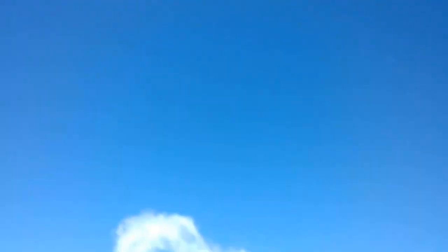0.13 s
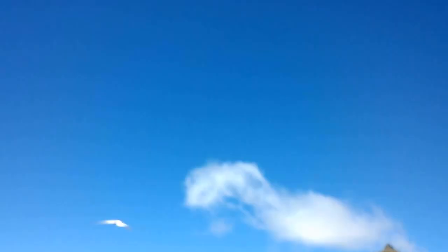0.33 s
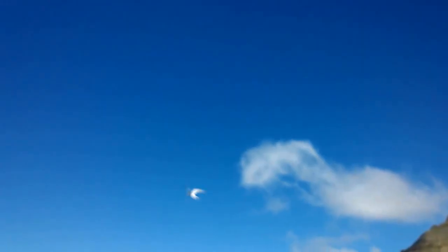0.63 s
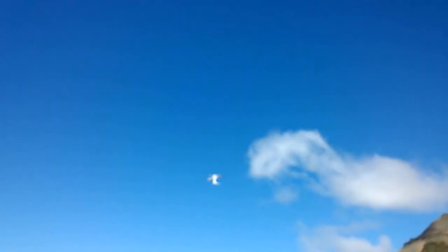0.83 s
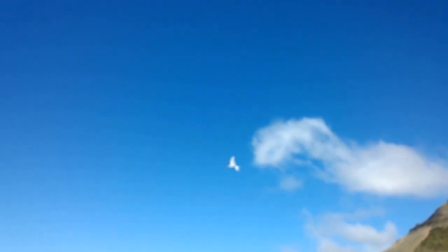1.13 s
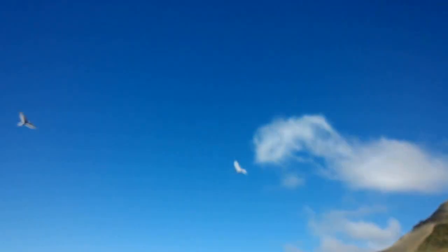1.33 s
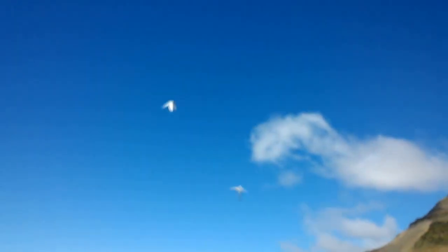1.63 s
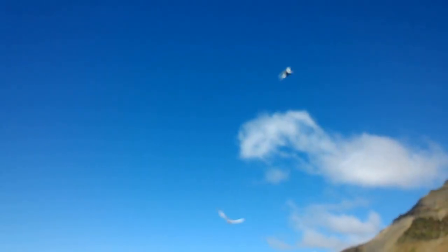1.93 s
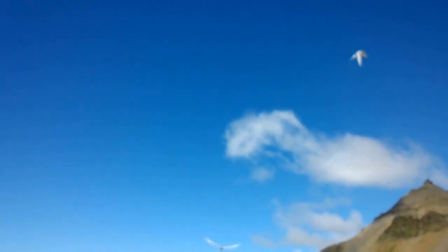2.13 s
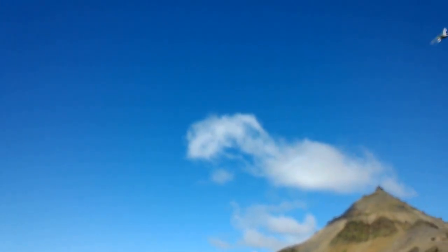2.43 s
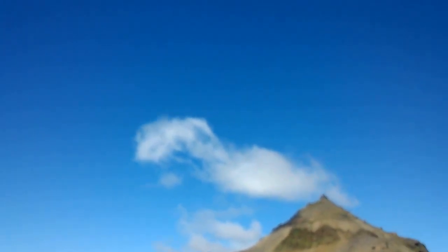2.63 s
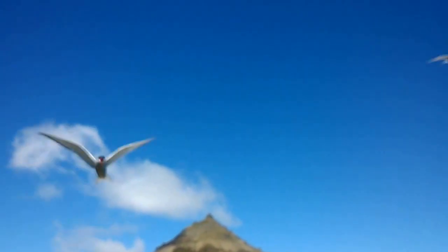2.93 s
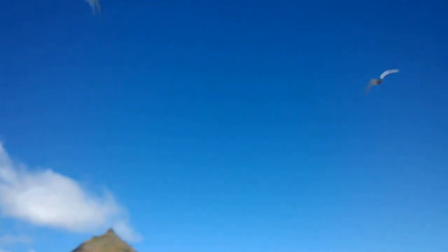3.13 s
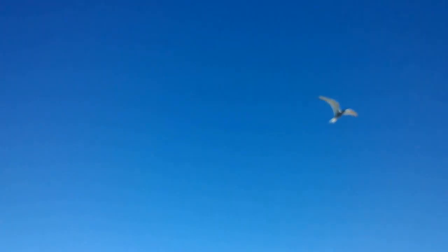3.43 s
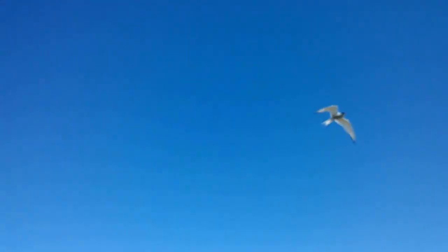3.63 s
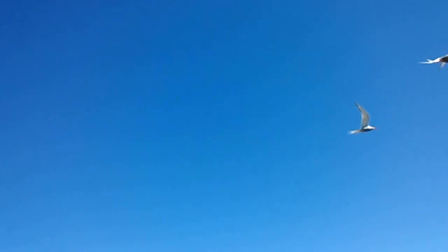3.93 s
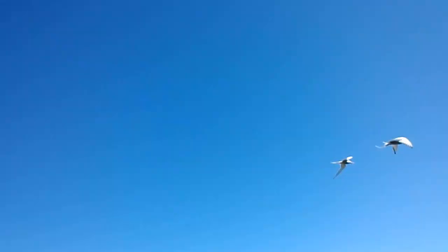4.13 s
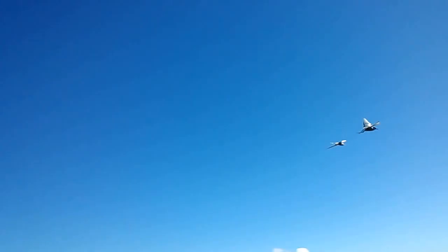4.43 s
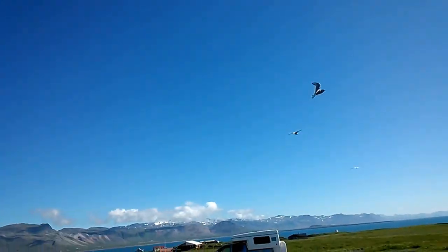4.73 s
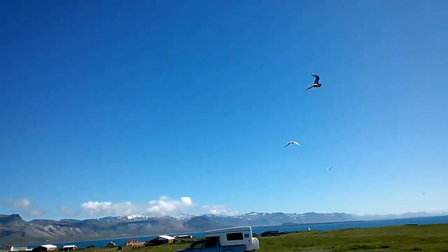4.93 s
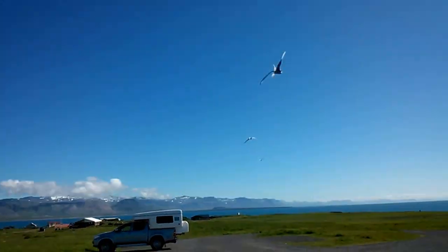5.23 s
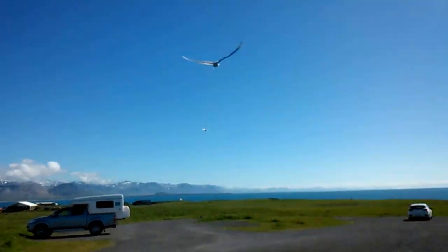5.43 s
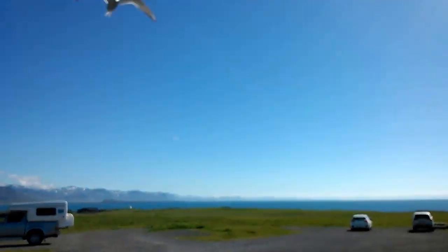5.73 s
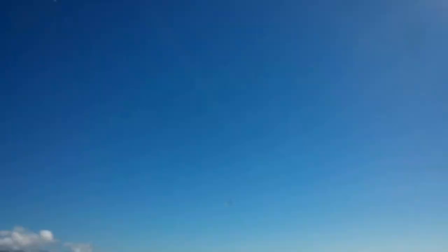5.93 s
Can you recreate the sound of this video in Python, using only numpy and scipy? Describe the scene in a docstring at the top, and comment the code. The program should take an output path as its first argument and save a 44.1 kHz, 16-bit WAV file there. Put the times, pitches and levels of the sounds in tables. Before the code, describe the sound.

Wind buffets a single microphone in an open field, with deep uneven rumble and blunt thumps. Above it, terns give high throbbing cries, dry croaks and a one-second-mark rasping rattle. Crisp keks build from about two seconds to a loud close attack just after three. After a throbbing cry and quieter calls, keks return quickly and end in a sudden screech. Hardly any echo, only faint hiss.

```python
"""Terns mobbing over open ground

Arctic terns mob an intruder: arched, throbbing 'kee-arr' cries and croaks, thin whistles, sharp 'kek' notes
and rasping rattles. A syrinx swinging freely is a harmonic series; one slapping shut is a noisy pulse train,
shaped by throat and beak. Harsh close rattles swell quickly and fade; the ground adds a faint tail.
Wind, as filtered noise and pressure pulses, rumbles and thumps on one microphone over patchy hiss and crackles."""
import sys
import numpy as np
from scipy import signal
from scipy.fft import rfft, irfft, next_fast_len
from scipy.io import wavfile
from scipy.ndimage import map_coordinates

SR = 44100
rng = np.random.default_rng(int(sys.argv[2]) if len(sys.argv) > 2 else 0)


def unload_wav(signal):
    """Save mono or channel-first audio to the path in sys.argv[1] as 16-bit WAV at rate SR, clipped to [-1, 1]."""
    wavfile.write(
        sys.argv[1],
        SR,
        np.round(np.clip(np.atleast_2d(signal).T, -1, 1) * 32767).astype(np.int16),
    )


N = 268304
TIME = np.arange(N) / SR  # [s]
TOP_HZ = 16000  # upper band limit

# Throbbing cries: (time [s], length [s], crest delay [s], crest pitch [Hz], end pitch [Hz], base level [dB],
# swell to the end [dB], octave re fundamental [dB], mean break rate [1/s], roughness [0-1], onset rasp re base [dB])
CRY_CALLS = [(0.083, 0.17, 0.054, 3120, 3020, -80.5, 7, -24, 28.5, 0.04, -36),
             (0.598, 0.18, .055, 3550, 3230, -39.5, -0.5, -15, 34.6, .07, -44),
             (1.403, .11, 0.045, 3400, 3310, -53.5, -8, -8, 54, 0.2, -17.5),
             (1.865, 0.069, .035, 3040, 2930, -59.5, -9, -2, 50, 0.06, -7),
             (3.978, .245, 0.14, 3272, 3142, -32, -10.5, -11.5, 40.8, .1, -8.5),
             (4.921, .222, 0.074, 3360, 3184, -44.5, 4, -15.5, 40, 0.15, -26.5)]
# Thin whistles: (time [s], length [s], crest delay [s], crest pitch [Hz], end pitch [Hz], level [dB],
# swell to the end [dB], octave re fundamental [dB], roughness [0-1])
WHISTLE_CALLS = [(1.934, 0.044, .011, 4100, 2770, -51.5, -6, -0.5, .17),
                 (1.981, 0.021, .006, 3140, 2920, -64, -3, -6, .3),
                 (2.292, 0.18, 0.033, 3500, 3400, -62, 6, -9.5, .01),
                 (3.666, 0.19, .02, 3552, 3475, -46, -17, -6.5, .015),
                 (5.918, 0.054, 0.012, 3300, 2970, -64, 4, -32, .15)]
# Distant rattles: (time [s], length [s], syllable rate [1/s], mean pulse rate at syllable start [1/s],
# base level [dB], swell to the end [dB], whistle re hoarse voice [dB], treble shelf [dB], roughness [0-1])
RASP_CALLS = [(0.196, 0.067, 51, 910, -53.5, -5, -12, 6, .5),
              (0.431, 0.042, 49, 790, -53, 12, -21, 2.5, 0.42),
              (0.987, 0.31, 47, 743, -35.5, 2, 1.5, -5.5, 0.7),
              (2.036, .17, 51, 810, -62.5, 15.5, -15, -45, 0.22),
              (3.878, 0.086, 41, 900, -52, -17, -10, -27.5, .3),
              (4.512, 0.13, 45, 1880, -55.5, -4, -18.5, -4, 0.62)]
# Croaked syllables: (time [s], length [s], first pulse rate [1/s], last pulse rate [1/s], level [dB],
# roughness [0-1], treble shelf [dB])
CROAK_SYLLABLES = [(0.256, 0.028, 2880, 2700, -62.5, 0.2, -25), (0.285, 0.023, 1000, 550, -59, 0.33, -19),
                   (0.785, 0.024, 1080, 1030, -46, 0.01, 2), (0.807, 0.024, 1020, 1010, -48.5, 0.1, 6),
                   (0.832, 0.023, 2050, 1700, -44.5, 0.17, 3), (0.855, 0.019, 1220, 980, -45, 0.14, 1),
                   (0.874, 0.022, 800, 750, -41.5, 0.6, 10), (0.893, 0.0218, 760, 750, -52, 0.9, 1),
                   (1.474, 0.046, 1800, 1700, -59.5, 0.6, -12), (4.223, 0.027, 1820, 1880, -52.5, 0.2, -11),
                   (4.248, 0.023, 980, 970, -51, 0.4, -15), (4.267, 0.033, 880, 710, -52.5, .3, -19.5),
                   (5.143, 0.022, 2070, 1900, -46.5, 0.14, -22),
                   (5.165, 0.026, 1850, 1630, -51.5, 0.3, -29), (5.187, 0.032, 580, 710, -54.5, 0.4, -20)]
# Harsh close screeches: (time [s], length [s], syllable rate [1/s], early hurry [s], sounding share [0-1],
# mean pulse rate at syllable start [1/s], roughness [0-1], peak level [dB], peak delay [s], peak half width [s])
SCREECH_CALLS = [(3.17, .195, 54.5, .0095, 0.86, 900, .55, -16.5, .024, 0.022),
                 (6.011, .08, 51, 0.00093, 1, 830, 0.57, -18, 0.0038, 0.021)]
# Clear whistled core of the second screech: (time [s], length [s], pitch [Hz], fundamental [dB], octave [dB],
# third harmonic [dB])
SHRIEK_TONES = [(6.013, 0.0093, 3055, -24, -17, -24.5), (6.04, 0.0084, 3774, -16.5, -33.5, -58),
                (6.056, 0.014, 3130, -26, -23.5, -23)]
# 'Kek' notes: (time [s], level [dB], treble shelf [dB], fade time [s], beak resonance [Hz])
KEK_NOTES = [(1.815, -44.5, -7, 0.011, 2730), (2.009, -41, -11.5, 0.0099, 2670),
             (2.167, -33.5, -8, 0.0097, 2710), (2.2858, -36, -11.5, 0.015, 5340),
             (2.4278, -28, -11.5, 0.012, 2840), (2.7804, -31, -15.5, 0.012, 2300),
             (2.9186, -20, -11.5, 0.012, 5140), (3.043, -30, -9, 0.011, 2330),
             (3.068, -13.5, -6, 0.019, 4300), (3.8554, -41.5, -8.5, 0.015, 3660),
             (5.22, -37, -9.5, 0.022, 3010), (5.3549, -30, -9, 0.014, 3000),
             (5.5213, -26, -11, 0.015, 3470), (5.686, -25.5, -13, .013, 2780),
             (5.8368, -41, -2, 0.0086, 3860), (5.8626, -19, -7.5, 0.018, 4000),
             (5.9851, -25, -3, 0.0084, 3970), (5.994, -30.5, -9, 0.012, 3970)]

# Throat resonances as relative spectra: (frequency [Hz], density [dB])
HOARSE_SPECTRUM = [(500, -25.5), (1000, -14.5), (1800, -1), (2700, 3), (3500, -1), (4300, -29.5),
                   (15000, -51)]
CROAK_SPECTRUM = [(700, -36), (1100, -16.5), (1450, 2), (2000, -0.5), (3300, 2), (4700, -7.5), (5500, -6.5),
                  (6500, -8), (7400, -29.5), (9500, -25.5), (15000, -31.5)]
FAR_SPECTRUM = [(700, -75), (1200, -23), (2000, -6.5), (2500, -13), (3000, 1), (3400, -11), (3900, -5),
                (5000, -17.5), (6500, -24.5), (7500, -38.5), (9200, -10.5), (11500, -30.5), (14000, -47)]
NEAR_SPECTRUM = [(500, -32), (1000, -28), (2000, -16.5), (2800, -14.5), (3400, -5), (4450, -3),
                 (5100, -18.5), (5900, -12), (8000, -27.5), (9800, -15), (12000, -23.5), (16000, -34.5)]
KEK_SPECTRUM = [(500, -26.5), (1000, -22.5), (2200, -10), (3100, -3.5), (3600, -11), (4200, -5),
                (5300, -8.5), (6500, -7.5), (8000, -17), (10500, -13.5), (15000, -16), (16500, -50)]

# Scatter from the terrain: (frequency [Hz], decay time to -60 dB [s])
GROUND_DECAY = [(300, .3), (3000, 0.85), (12000, 0.1)]
# Wind on the microphone, before gusts and trim: (time [s], rumble level [dB], flutter level [dB])
WIND_LEVELS = [(0, -39.5, -55), (.11, -75, -100), (.18, -83, -69), (.23, -27, -35.5), (.85, -29, -35.5),
               (1.15, -27.5, -39.5), (1.8, -23, -36.5), (2.1, -29.5, -45.5), (2.4, -28, -35.5),
               (2.67, -40.5, -68.5), (2.85, -34, -60), (3.18, -33, -46), (3.3, -47, -94), (3.48, -29, -77),
               (3.85, -28, -44), (4.02, -29.5, -60), (4.22, -24, -49), (4.33, -29.5, -36),
               (4.58, -32.5, -51), (4.85, -30.5, -43), (5.1, -32, -58.5), (5.45, -34, -62.5),
               (6.08, -29.5, -38.5)]
# Relative spectra of the wind noise: (frequency [Hz], density [dB])
RUMBLE_SPECTRUM = [(15, -48), (25, -19), (40, 2.5), (62, 8.5), (110, 4), (200, -8), (320, -27.5),
                   (500, -51.5), (900, -81)]
FLUTTER_SPECTRUM = [(100, -37), (200, 4), (300, 3.5), (500, -7.5), (750, -20.5), (1100, -34.5),
                    (1600, -46.5), (4000, -110)]
# Eddies, before the port leak: (time [s], pressure [dB], half width [ms], surrounding gust [dB])
EDDIES = [(.228, -17, 0.75, -3.5), (.312, -0.5, 1.54, -1.5), (.487, -1.5, 0.77, -4.5), (.494, -7, .4, -4),
          (.52, -12, 1.03, -1.5), (.552, -12.5, 0.76, -0.5), (.834, -15.5, 1.2, 0), (.889, -11, 1.2, 0.5),
          (.965, -7, 0.54, 3.5), (1.02, -4, 1.1, -8.5), (1.107, -12, 1.5, -4), (1.358, -10, 0.87, -3),
          (1.384, -12.5, 0.56, -3), (1.439, -13, 2.1, -7), (1.455, -3.5, 0.62, 0.5),
          (1.554, -4.5, 1.64, -3), (1.652, -9.5, 0.91, -5), (1.758, -6.5, 1.06, -3),
          (1.88, -7, 1.95, -10.5), (1.957, -7, 0.66, -4.5), (1.994, -5.5, 0.62, 0.5),
          (2.209, -10.5, 0.95, 2), (2.305, -7.5, 0.7, 5), (2.328, -5, 0.5, -12), (2.388, -14.5, 0.65, -5),
          (2.478, -5.5, 1.07, 9), (2.497, -10, 0.98, 0.5), (2.606, -13.5, 0.81, 2), (2.77, -13.5, 5.8, 14),
          (2.901, -24, 2.5, 9), (3.163, -19, 1.45, -1), (3.57, -10.5, 14, 12), (3.722, -4, 2.2, 8.5),
          (4.292, -0.5, 0.17, 7.5), (4.311, -13.5, 0.3, 0.5), (4.33, -10, 0.3, 0.5), (4.348, -15, 0.31, 3),
          (4.383, -13.5, .35, 4), (4.4, -14.5, 0.38, -1.5), (4.47, -13.5, 0.4, 9), (4.666, -10, 1.5, 0),
          (4.723, -10, 0.49, 0.5), (4.777, -10.5, 1.57, 0), (4.828, -14, 1.18, 3), (4.85, -14, 0.98, 0),
          (5.014, -15, 0.65, 2.5), (5.167, -3.5, 0.44, 9), (5.177, -9, 0.62, 3.5), (5.548, -7, 1.75, 13),
          (5.697, -2, 1.19, 5.5), (5.821, -13.5, 1, 2), (5.962, -10.5, 0.96, -9.5),
          (5.992, -13.5, 0.21, 11)]
# Patches of airy hiss: (time [s], length [s], level [dB], swell to the end [dB])
AIR_PATCHES = [(0, 0.061, -63, -19), (2.527, 0.38, -54.5, -42.5), (2.769, 0.73, -63.5, 13),
               (4.97, 0.2, -62.5, -4), (5.345, 0.15, -56.5, -10), (5.58, 0.1, -61, 24.5),
               (5.818, 0.12, -59.5, -7.5)]
# Relative spectrum of the hiss: (frequency [Hz], density [dB])
HISS_SPECTRUM = [(300, -1), (1000, 2), (4000, -1.5), (7000, -11), (9500, -5.5), (12000, -12.5),
                 (16000, -11.5)]
# Soft treble crackles, before their rising ramp: (time [s], length [s], level [dB])
CRACKLES = [(.481, 0.012, -47.5), (.726, 0.17, -43.5), (5.588, 0.133, -49.5), (5.751, 0.061, -52)]

CRY_SCOOP, CRY_ATTACK_S, CRY_ATTACK_DB = .17, 0.039, 12  # a cry starts this share flat, and this much softer
CRY_BELLY_DB = 0.5  # mid-cry boost
FRAY_SHARE = 1 / 3  # pitch of the hoarse voice over that of the whistle
BREAK_DEPTH, BREAK_WIDTH = .88, .15  # share of the level lost; half width in throb periods
BREAK_LIFT = .04  # share of pitch gained, times the squared depth of the gap
ONSET_RASP_RATE, ONSET_RASP_FADE_DB = 800, 31.5  # mean pulses per second; loss by the end of the cry
WHISTLE_SCOOP, SCOOP_S = 0.057, 0.014  # share of pitch flat at the start; scoop time
ARCH_POWER = 0.88  # exponent of the pitch sag away from the crest; below 1 is pointed
RASP_EDGE_S, RASP_EDGE_DB, RASP_SAG_DB = 0.012, 7.5, 6  # soft outer syllables, slack middle
SYLLABLE_SCATTER_DB, PITCH_SCATTER = 1.5, .022  # standard deviations between rattle syllables
BEAK_DB, BEAK_WIDTH_HZ = 5.5, 580  # height and half width of the beak resonance
KEK_ATTACK_S, KEK_ATTACK_DB = 0.0018, 10.5  # rise time of a note; how much softer it starts
GUST_S, FLUTTER_GROWS = 0.032, 1.76  # half length of a gust; flutter gain in dB per dB of rumble
AIR_FLOOR_DB, AIR_EDGE_SHARE = -82, 0.021  # hiss between patches; share of a patch spent on each fade
CEILING, CEILING_HARDNESS = .55, 4  # limit as a share of full scale; how abruptly it is reached


def amp(db):
    """Level in decibels as an amplitude ratio."""
    return 10 ** (np.asarray(db) / 20)


def unit(x):
    """Normalization to an rms of 1."""
    return x / np.sqrt(np.mean(x ** 2) + 1e-20)


def along(points, hz):
    """Linear interpolation of (frequency, value) points on a logarithmic frequency axis."""
    f, v = np.transpose(points)
    return np.interp(np.log(hz + 1), np.log(f + 1), v)


def curves(rows, t):
    """Linear interpolation in time of each column after the first."""
    s, *cols = np.transpose(rows)
    return [np.interp(t, s, c) for c in cols]


def wobble(rate, size):
    """Smooth random modulation: a spline through normal deviates, rate knots a second."""
    knots = rng.standard_normal(int(size * rate / SR) + 4)
    return map_coordinates(knots, [np.arange(size) * rate / SR])


def filtered(x, response):
    """Linear filtering: the spectrum of x times a response of frequency."""
    m = next_fast_len(len(x) + 8192)
    return irfft(rfft(x, m) * response(np.fft.rfftfreq(m, 1 / SR)), m)[:len(x)]


def coloured(x, spectrum, treble_db=0):
    """Minimum-phase filtering: folding the cepstrum makes the resonances ring causally; rms 1."""
    m = 2 * next_fast_len(len(x) + SR // 10)
    hz = np.fft.rfftfreq(m, 1 / SR)
    shelf_db = along([(5000, 0), (8500, treble_db)], hz)
    cepstrum = irfft(np.log(amp(along(spectrum, hz) + shelf_db)))
    cepstrum[1:m // 2] *= 2
    cepstrum[m // 2 + 1:] = 0
    return unit(irfft(rfft(x, m) * np.exp(rfft(cepstrum)))[:len(x)])


def span(length):
    """Sample times from 0 to length, at least 16 of them."""
    return np.arange(max(int(length * SR), 16)) / SR


def fade(t, edge):
    """Sine-squared envelope that softens the start and end of a note."""
    return np.sin(np.pi / 2 * np.clip(np.minimum(t - t[0], t[-1] - t) / edge, 0, 1)) ** 2


def add(track, s, x):
    """Superposition of x on the track from s seconds on."""
    part = track[round(s * SR):][:len(x)]
    part += x[:len(part)]


def whistle(pitch, levels_db, rough):
    """Free oscillation of the syrinx: harmonics sharing one tremor of phase and strength."""
    size = len(pitch)
    drifting = pitch * (1 + 0.0005 * wobble(210, size))
    phase = 2 * np.pi * np.cumsum(drifting) / SR + rough * wobble(720, size)
    stack = sum(amp(db) * np.sin(k * phase) for k, db in enumerate(levels_db, 1))
    return np.sqrt(2) * stack * (1 + rough * wobble(1000, size))


def clatter(rate, rough):
    """Impact excitation: the syrinx slaps shut unevenly, each pulse trailing a puff of turbulence."""
    size, rough = len(rate), np.clip(rough, 0, 1)
    cycles = np.cumsum(rate * np.exp(.13 * rough * wobble(900, size))) / SR + .9
    offset = ((cycles + .5) % 1 - .5) / rate  # seconds from the nearest slap
    slaps = np.sinc(2 * TOP_HZ * offset) * np.exp(-(offset * TOP_HZ / 2) ** 2)
    pulses = slaps * amp(4 * rough * wobble(1000, size))
    puffs = rng.standard_normal(size) * np.exp(-2 * (cycles % 1))
    return unit(pulses - pulses.mean()) + rough * unit(puffs)


def harsh(rate, rough, throat, treble_db=0):
    """Source and filter: pulses through throat and beak resonances that vary from call to call."""
    def beak(hz):
        ripple = map_coordinates(rng.standard_normal(64), [hz / 400], mode="mirror")
        delay = .0009 * (1 + .5 * ripple)  # resonant frequencies linger, so the pulses run together
        return amp(3 * ripple) * np.exp(-2j * np.pi * np.cumsum(delay) * hz[1])
    return coloured(filtered(clatter(rate, rough), beak), throat, treble_db)


def arch(t, crest_s, crest_hz, end_hz, scoop):
    """Frequency glide of a call: it scoops up from below, crests and sags to its end."""
    away = np.abs(t - crest_s) / max(t[-1] - crest_s, .001)
    sagging = crest_hz - (crest_hz - end_hz) * away ** ARCH_POWER
    return sagging * (1 - scoop * np.exp(-(t / SCOOP_S) ** 2))


def cries(third_db=-5, fourth_db=-12.5, fray_db=-17, fray_s=0.017):
    """Amplitude and frequency modulation: an arched tone breaks off repeatedly, its pitch flicking up each time."""
    out = np.zeros(N)
    for (s, length, crest_s, crest_hz, end_hz, db, swell_db,
         octave_db, rate, rough, rasp_db) in CRY_CALLS:
        t = span(length)
        u = t / length
        from_break = np.abs((t * rate + 0.045 * wobble(22, len(t)) + .5) % 1 - .5)
        gap = np.exp(-(from_break / BREAK_WIDTH) ** 3) * BREAK_DEPTH
        pitch = arch(t, crest_s, crest_hz, end_hz, CRY_SCOOP) * (1 + BREAK_LIFT * gap ** 2)
        attack_db = CRY_ATTACK_DB * np.maximum(1 - t / CRY_ATTACK_S, 0)
        level_db = db + swell_db * u + CRY_BELLY_DB * np.sin(np.pi * u) - attack_db
        uneven_db = rough * 12 * wobble(35, len(t))  # rougher cries are also less even
        harmonics_db = [uneven_db, octave_db, octave_db + third_db, octave_db + fourth_db]
        tone = whistle(pitch, harmonics_db, rough)
        # towards the end a hoarse lower voice creeps in under the whistle
        fray = amp(fray_db) * np.exp((t - t[-1]) / fray_s)
        tone = tone + fray * harsh(FRAY_SHARE * pitch, 0.055, CROAK_SPECTRUM)
        add(out, s, amp(level_db) * tone * (1 - gap) * fade(t, 0.004))
        # a hoarse rasp sounds under the start of the cry and fades raggedly
        rasp = harsh(np.full(len(t), ONSET_RASP_RATE), 0.89, HOARSE_SPECTRUM)
        rasp = rasp * amp(1.3 * wobble(90, len(t)))
        fading = amp(db + rasp_db - ONSET_RASP_FADE_DB * u ** 2)
        add(out, s - .008, fading * rasp * (1 - gap / 2) * fade(t, 0.0055))
    return out


def croaks():
    """Pulse-train voicing: short syllables of stacked partials whose pulse rate glides, mostly downward."""
    out = np.zeros(N)
    for s, length, first_rate, last_rate, db, rough, treble_db in CROAK_SYLLABLES:
        t = span(length)
        rate = np.linspace(first_rate, last_rate, len(t))
        voice = harsh(rate, rough, CROAK_SPECTRUM, treble_db)
        add(out, s, amp(db) * voice * fade(t, .005))
    return out


def screeches(fall=0.14):
    """Swelling rattle: harsh syllables rise to a peak and fade; piercing tones cut through the second."""
    out = np.zeros(N)
    for (s, length, rate, hurry_s, share, pulse_rate,
         rough, peak_db, peak_s, width_s) in SCREECH_CALLS:
        t = span(share / rate + 0.011)
        decay = np.exp(-np.maximum(t - .8 * share / rate, 0) / .003)
        shape = fade(t, .003) * (.12 + .88 * decay)
        for k, beat in enumerate(np.arange(0, length, 1 / rate)):
            after = beat - hurry_s * (1 - np.exp(-k / 1.3))
            swell = 1 / np.hypot(1, (after - peak_s) / width_s)
            pulses = pulse_rate * np.exp(rng.normal(0, 0.036)) * (1 - fall * t / t[-1])
            voice = harsh(pulses, rough, NEAR_SPECTRUM)
            add(out, s + after, amp(peak_db) * swell * voice * shape)
    for s, length, pitch, *levels in SHRIEK_TONES:
        t = span(length)
        add(out, s, whistle(np.full(len(t), pitch), levels, rough=0.18) * fade(t, 0.0011))
    return out


def keks(rate=600, rough=.6):
    """Damped pulse train: slaps of the syrinx swell at once, slow down and fade; the open beak lifts one band."""
    out, t = np.zeros(N), span(.06)
    for s, db, treble_db, life, beak_hz in KEK_NOTES:
        slowing = rate * np.exp(rng.normal(0, 0.1) - 5 * t)
        voice = harsh(slowing, rough, KEK_SPECTRUM, treble_db)
        voice = unit(filtered(voice, lambda hz: amp(
            BEAK_DB * np.exp(-((hz - beak_hz) / BEAK_WIDTH_HZ) ** 2))))
        shape = fade(t, 0.00082) * (np.exp(-(t / life) ** 2) + 0.037 * np.exp(-t / life))
        rise_db = KEK_ATTACK_DB * np.minimum(t / KEK_ATTACK_S - 1, 0)
        add(out, s, amp(db + rise_db) * voice * shape)
    return out


def rasps(pitch_hz=3030, fall=0.038):
    """Rapid syllabic modulation: a run of hoarse pulse trains, each mixed with a falling whistle."""
    out = np.zeros(N)
    for s, length, rate, pulse_rate, db, swell_db, tone_db, treble_db, rough in RASP_CALLS:
        t = span(1 / rate)
        shape = fade(t, 0.002) * (0.12 + np.exp(-(t * rate / 0.74) ** 5))
        for after in np.arange(0, length, 1 / rate):
            u = after / length
            edge = max(1 - min(after, length - after - t[-1]) / RASP_EDGE_S, 0)
            level_db = db + swell_db * u - RASP_SAG_DB * np.sin(np.pi * u) - RASP_EDGE_DB * edge
            bend = (1 + PITCH_SCATTER * rng.normal()) * (1 - fall * t * rate)
            hoarse = harsh(pulse_rate * bend, rough, FAR_SPECTRUM, treble_db)
            harmonics_db = tone_db + np.array([0, -19, -21 + treble_db])
            tone = whistle(pitch_hz * bend, harmonics_db, .2)
            gain = amp(level_db + SYLLABLE_SCATTER_DB * rng.normal())
            add(out, s + after, unit(hoarse + tone) * shape * gain)
    return out


def whistles(third_db=-14, fourth_db=-21):
    """Sustained free oscillation: thin unbroken harmonic tones on an arch of pitch."""
    out = np.zeros(N)
    for s, length, crest_s, crest_hz, end_hz, db, swell_db, octave_db, rough in WHISTLE_CALLS:
        t = span(length)
        pitch = arch(t, crest_s, crest_hz, end_hz, WHISTLE_SCOOP)
        harmonics_db = [0, octave_db, octave_db + third_db, octave_db + fourth_db]
        tone = whistle(pitch, harmonics_db, rough)
        add(out, s, amp(db + swell_db * t / length) * tone * fade(t, 0.0018))
    return out


def terrain(x):
    """Diffuse scattering: convolution with noise that decays at a rate set by frequency."""
    hz, t, z = signal.stft(rng.standard_normal(SR // 2), SR, nperseg=256)
    decay = amp(-60 * t / along(GROUND_DECAY, hz)[:, None])
    tail = signal.istft(z * decay, SR, nperseg=256)[1]
    return signal.fftconvolve(x, tail / np.linalg.norm(tail))[:N]


def wind(rumble_db=-1, flutter_db=-1, port_hz=48, wake_db=-19, wake_s=0.01):
    """Turbulent pressure at the microphone port: lumpy rumble, flutter riding on it, and sharp eddies in gusts."""
    low_db, mid_db = curves(WIND_LEVELS, TIME)
    lumps = wobble(55, N)
    rumble = coloured(rng.standard_normal(N) * amp(2 * lumps), RUMBLE_SPECTRUM)
    flutter = coloured(rng.standard_normal(N), FLUTTER_SPECTRUM)
    flutter = unit(flutter * amp(9 * np.tanh(lumps / 1.5) + 3 * wobble(130, N)))
    (eddies, wakes, gust_db), t = np.zeros((3, N)), span(.2) - .1
    for s, db, width_ms, swell_db in EDDIES:
        u = 1000 * t / width_ms
        push = amp(db) / (1 + u * u) * (1 + 0.094 * wobble(688, len(t)))
        add(eddies, s + t[0], push * fade(t, 0.0076))
        wake = amp(db + wake_db) * np.exp(-(t / wake_s) ** 2)
        add(wakes, s + t[0], wake / (1 + width_ms / 2))  # small eddies churn the most
        add(gust_db, s + t[0], swell_db * np.exp(-(t / GUST_S) ** 2))
    churn_spectrum = [(80, -0.5), (250, 10.5), (650, -7.5), (950, -24.5), (1500, -34), (2200, -43), (5000, -110)]
    churn = wakes * coloured(rng.standard_normal(N), churn_spectrum)
    # the port leaks slow pressure, so each push swings back
    thumps = filtered(eddies, lambda hz: hz ** 4 / (hz ** 4 + port_hz ** 4) / (1 + (hz / 1700) ** 4))
    rumble = amp(low_db + gust_db + rumble_db) * rumble
    flutter = amp(mid_db + FLUTTER_GROWS * gust_db + flutter_db) * flutter
    gusts = rumble + flutter + thumps + churn
    return filtered(gusts, lambda hz: hz ** 4 / (hz ** 4 + 30 ** 4))  # the deepest bass escapes the port


def rustle():
    """Strongly modulated noise: brief soft crackles that grow, high in the treble."""
    out = np.zeros(N)
    spectrum = [(2000, -7), (6000, -12), (8500, -0.5), (11000, -2.5), (13000, -24), (16000, -2.5)]
    for s, length, db in CRACKLES:
        t = span(length)
        grains = rng.standard_normal(len(t)) * amp(8 * wobble(300, len(t)))
        add(out, s, amp(db) * coloured(grains, spectrum) * fade(t, 0.00284) * (t / length))
    return out


def air():
    """Broadband noise under a slow envelope: a faint hiss that comes and goes in patches."""
    level = np.full(N, amp(AIR_FLOOR_DB))
    for s, length, db, swell_db in AIR_PATCHES:
        t = span(length)
        add(level, s, amp(db + swell_db * t / length) * fade(t, AIR_EDGE_SHARE * length))
    hiss = coloured(rng.standard_normal(N), HISS_SPECTRUM)
    return level * unit(hiss * amp(1.5 * wobble(330, N)))


def scene():
    """Superposition of the birds, their scatter from the ground, the wind, hiss and crackles."""
    birds = cries() + whistles() + rasps() + croaks() + screeches() + keks()
    return (birds + amp(-38.5) * terrain(birds) + wind() + air() + rustle())[None]


def record(dry):
    """Saturation and band limiting: the strongest peaks are rounded off, then the top is cut."""
    held = dry / (1 + np.abs(dry / CEILING) ** CEILING_HARDNESS) ** (1 / CEILING_HARDNESS)
    return np.array([filtered(x, lambda hz: 1 / (1 + (hz / TOP_HZ) ** 80)) for x in held])


dry = scene()
out = record(dry)
unload_wav(out)
```